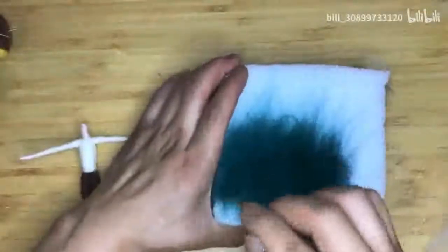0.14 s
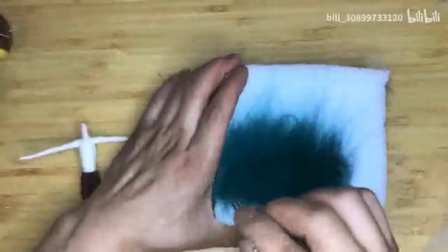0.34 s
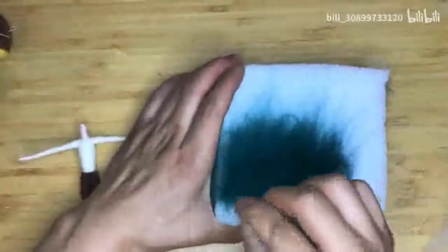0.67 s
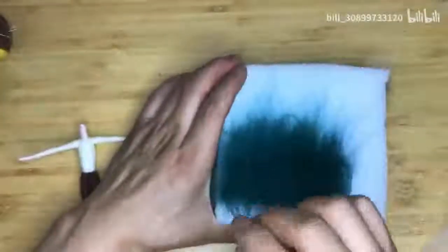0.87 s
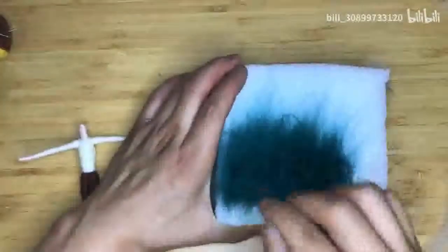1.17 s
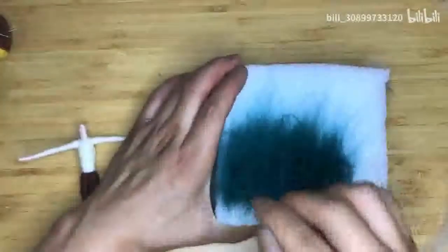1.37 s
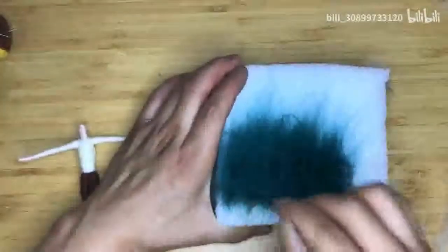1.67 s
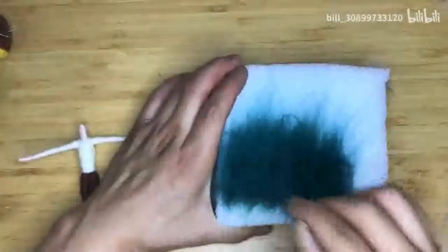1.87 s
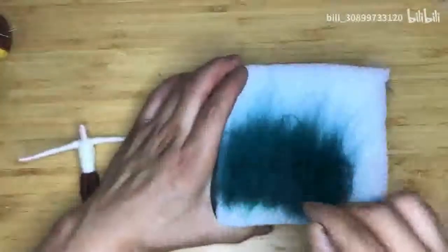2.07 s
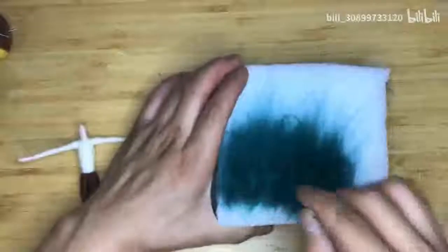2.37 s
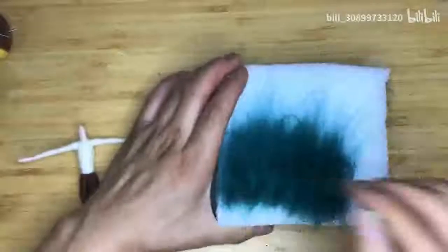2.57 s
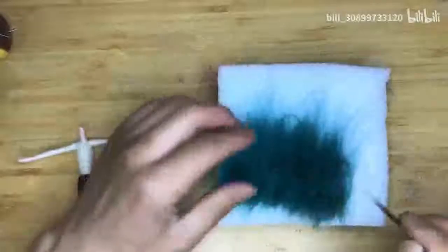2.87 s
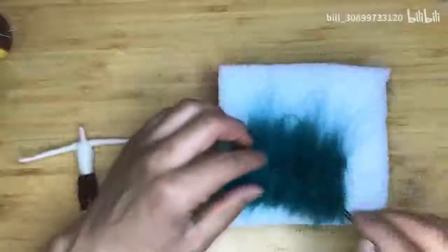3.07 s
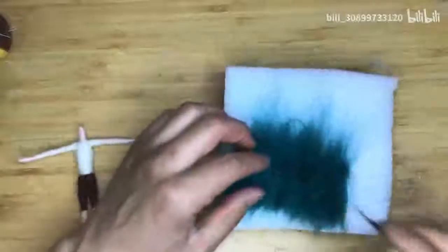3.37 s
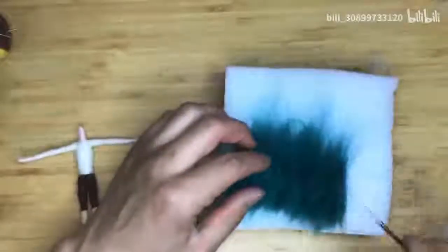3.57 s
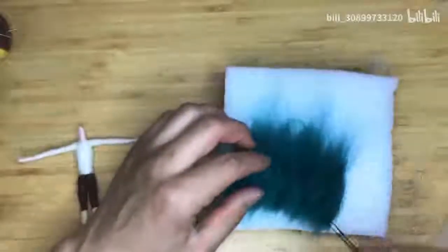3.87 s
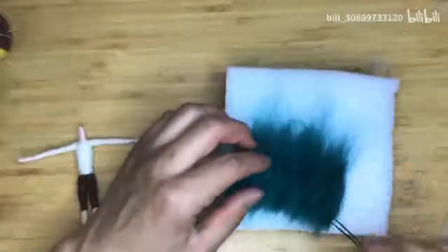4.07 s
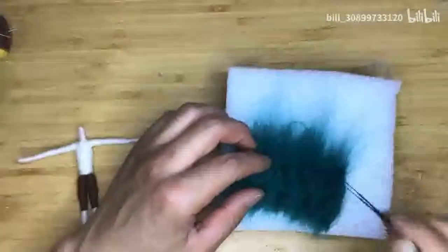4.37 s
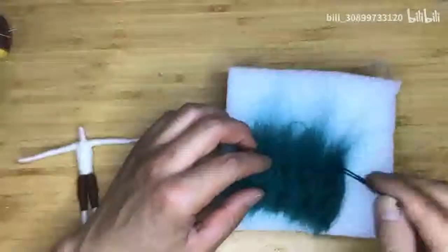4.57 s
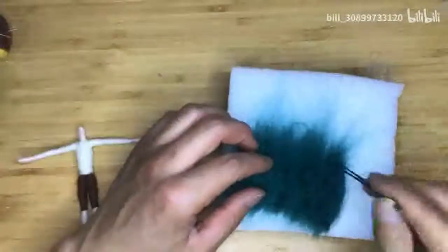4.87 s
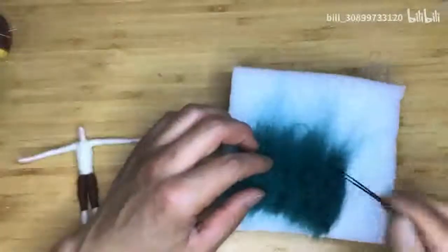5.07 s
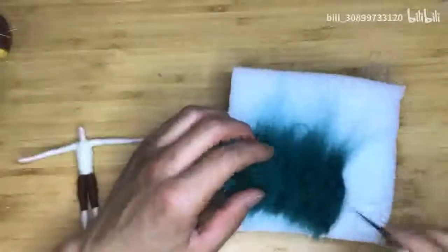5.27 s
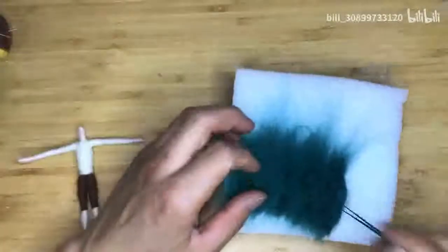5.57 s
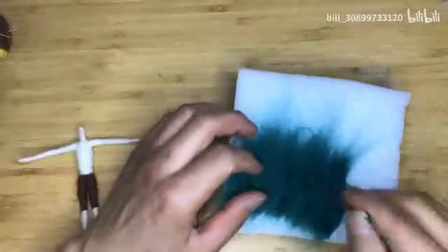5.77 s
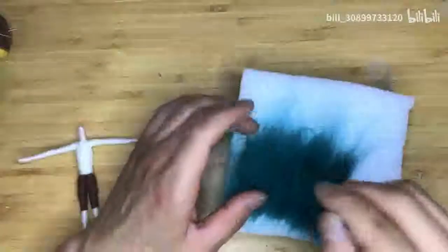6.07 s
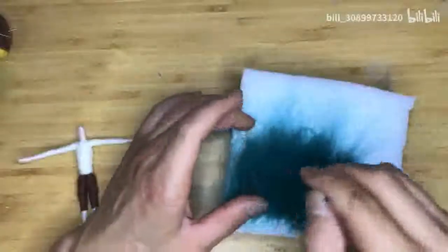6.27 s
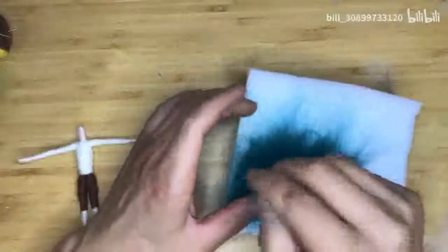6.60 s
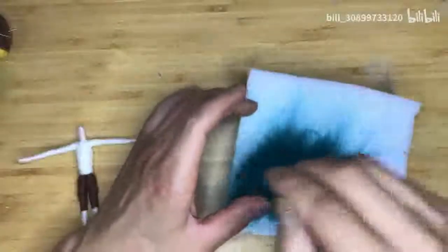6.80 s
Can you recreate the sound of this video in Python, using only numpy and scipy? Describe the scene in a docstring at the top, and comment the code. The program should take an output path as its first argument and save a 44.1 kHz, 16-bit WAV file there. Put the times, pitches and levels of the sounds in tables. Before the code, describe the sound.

Soft wool rustling gives way to brisk dry stabs, about seven a second, each a crackly push and a duller pull. After a short break with rustling, the stabbing resumes, joined by woody hand bumps and low scuffs on the table. It thins out to two isolated stabs. Very faint falling bird notes come from outside; the microphone is close, the room small and hushed.

```python
"""Wool rustles on a foam pad on a wooden table, then a needle stabs it in runs of about seven a second.
Each push excites a noisy crowd of fibre slips and a short hollow resonance; each pull rasps more softly.
From the first stab on, single strands snap, and table modes answer pushes and the hand's knocks; midway the
hand begins to slide on the wood. A faint bird calls early, midway and late; wool rustles in the pauses,
and two slow stabs come last. A short reverberant tail, noise and a low drone form the small, quiet room."""
import sys
import numpy as np
from scipy import signal
from scipy.fft import rfft, irfft
from scipy.io import wavfile

SR = 44100
rng = np.random.default_rng(int(sys.argv[2]) if len(sys.argv) > 2 else 0)


def generate_wav(sig):
    """Save sig (samples, or channels by samples) to the path in sys.argv[1] as 16-bit PCM at SR."""
    pcm = np.round(np.clip(np.atleast_2d(sig).T, -1, 1) * 32767).astype(np.int16)
    wavfile.write(sys.argv[1], SR, pcm)


N = 306054  # samples

LEAD_S = 0.015  # the point touches the fluff this long before it breaks in

# level of the pull after a usual stab, and the share of a harder or softer push that carries over
USUAL_STAB_DB, PULL_DB, PULL_FOLLOWS = -36, -43.5, 0.5

# thrusts of the needle: start_s, push_length_s, crackle_level_db
NEEDLE_STABS = [(0.339, 0.033, -38.5), (0.629, 0.036, -41), (0.801, 0.023, -35.5), (0.949, .024, -36),
                (1.093, .024, -36), (1.23, .025, -36), (1.363, 0.03, -37), (1.506, 0.022, -36.5),
                (1.642, 0.025, -38), (1.768, 0.027, -36), (1.901, 0.029, -36.5), (2.052, 0.026, -33.5),
                (2.195, .022, -32.5), (2.752, 0.052, -46.5), (2.927, 0.028, -37), (3.096, 0.023, -36),
                (3.46, .043, -40.5), (3.624, 0.028, -38), (3.767, 0.029, -33), (3.942, 0.027, -40),
                (4.093, .024, -37.5), (4.244, 0.029, -36.5), (4.403, 0.029, -32), (4.553, .026, -31.5),
                (4.7, 0.025, -33.5), (4.844, 0.028, -37.5), (4.976, 0.031, -39.5), (5.119, 0.03, -37),
                (5.26, .031, -36.5), (5.463, 0.028, -36), (5.611, 0.034, -31.5), (6.012, 0.042, -33.5),
                (6.771, 0.04, -43.5)]


def needle():
    """Periodic excitation: each pull takes its timing and strength from its push."""
    out = np.zeros(N)
    for start_s, push_s, push_db in NEEDLE_STABS:
        ring_hz = ring_centre(start_s)
        pull_db = PULL_DB + PULL_FOLLOWS * (push_db - USUAL_STAB_DB)
        add(out, start_s - LEAD_S, push(push_s, push_db, ring_hz))
        add(out, start_s, pull(pull_lag(push_s), pull_db, ring_hz, push_s))
    return out


# spectral outline of the tearing fibres: frequency_hz, gain_db
CRACKLE_COLOUR = [(200, -30), (500, -9), (1000, -3), (2200, -5.5), (2700, -1.5), (3300, -0.5), (4300, 0.5),
                  (5600, 0), (8000, -4), (9800, -7.5), (12000, -5), (13200, -7), (15000, -5)]

# the ring is as loud as the crackle at this centre; the lower it sits, the fuller it sounds
EVEN_RING_HZ, RING_DB_PER_OCTAVE = 1643, -8.5


def push(length_s, crackle_db, ring_hz, tilt_db=0.67, ring_width_hz=520,
         rub_db=-5, load_db=-17, load_hz=360):
    """Stick-slip friction crackles and rings the pad; the foam hands the growing load to the table."""
    t = clock(0.3) - LEAD_S
    speed = tearing(t, length_s)
    depth = np.clip(t / length_s, 0, 1)

    # single fibres slip off the barbs while the shaft rubs smoothly past the rest
    slips = speed * fibres(len(t), per_s=1900, spread_db=3.5)
    rub = speed * rng.standard_normal(len(t))
    friction = level(slips, 0, length_s) + level(rub, rub_db, length_s)

    crackle = hands(colour(friction, tilted(CRACKLE_COLOUR, tilt_db)))
    ring = hands(hollow(slips, ring_hz, ring_width_hz))
    thud = table_top(soften(rub * depth, load_hz, order=2))

    ring_db = crackle_db + RING_DB_PER_OCTAVE * np.log2(ring_hz / EVEN_RING_HZ)
    thud_db = (crackle_db + ring_db) / 2 + load_db
    mix = level(crackle, crackle_db, length_s) + level(ring, ring_db, length_s)
    return mix + level(thud, thud_db, length_s)


def tearing(t, length_s, entry=0.66, fluff=0.25, fluff_s=0.0026, stop_s=0.0062):
    """Friction follows the motion: the point brushes fluff, breaks in, works hardest midway and stops."""
    stroke = entry + np.sin(np.pi * np.clip(t / length_s, 0, 1))
    inside = stroke * np.exp(-np.maximum(t - length_s, 0) / stop_s)
    touch = fluff * np.exp(-np.abs(t) / fluff_s)
    return np.where(t < 0, touch, inside) * surges(len(t), per_s=458.4, depth_db=1.0)


def pull(middle_s, db, ring_hz, push_s, rasp_db=-6, rasp_hz=7500, ring_db=1,
         ring_width_hz=520, load_db=-16):
    """Friction with the grain gives a finer, duller rasp; the pad rings only while barbs catch midway."""
    t = clock(0.3)
    width_s = 0.29 * push_s  # a slow push is followed by a slow pull
    catch = np.exp(-((t - middle_s) / width_s) ** 2 / 2)
    slips = fibres(len(t), per_s=6500, spread_db=5.5)

    # the cube root lets the rasp last longer than the catch
    rasp = hands(soften(colour(np.cbrt(catch) * slips, CRACKLE_COLOUR), rasp_hz))
    ring = hands(hollow(catch * slips, ring_hz, ring_width_hz))
    thud = table_top(soften(catch * slips, 315, order=2))

    layers = [(rasp, rasp_db), (ring, ring_db), (thud, load_db)]
    return sum(level(x, db + share_db, 2 * width_s) for x, share_db in layers)


# the middle of the pull follows the start of the push by the hand's turn plus so many push lengths
TURN_S, PULL_LAG_PUSHES = 0.022, 1.416


def pull_lag(push_s):
    """Stroke kinematics: time from the start of a push to the middle of its pull."""
    return TURN_S + PULL_LAG_PUSHES * push_s


# strands that stand out give way singly: start_s, crackle_level_db, hollow_ring_level_db
STRAND_SNAPS = [(0.3401, -24.5, -14.5), (0.3498, -39, -22), (1.102, -33, -24), (1.2485, -23.5, -47),
                (1.385, -35, -25), (1.5051, -27.5, -30.5), (1.6503, -24, -27.5), (1.7651, -21.5, -29),
                (1.79, -24, -26), (1.9241, -31, -26), (2.1941, -25, -29), (3.0951, -30, -29),
                (3.635, -25, -60), (3.8587, -36, -40), (4.169, -35, -42.5), (4.2521, -24, -60),
                (4.8451, -26, -33.5), (5.489, -32, -32), (5.5345, -34.5, -53), (6.016, -21, -34),
                (6.436, -55, -68)]


def snaps(length_s=0.0018, fray=0.21, fray_s=0.0012, tilt_db=1.44, muffling=0.6, ring_width_hz=240):
    """Impulsive rupture: a click with brief fraying, duller deep in the pad where the ring outweighs it."""
    out, t = np.zeros(N), clock(0.03)
    for start_s, crackle_db, ring_db in STRAND_SNAPS:
        click = (t == 0) + fray * np.exp(-t / fray_s) * rng.standard_normal(len(t))
        snap_tilt_db = tilt_db - muffling * max(ring_db - crackle_db, 0)
        crackle = colour(click, tilted(CRACKLE_COLOUR, snap_tilt_db))
        ring = hollow(click, ring_centre(start_s), ring_width_hz)
        add(out, start_s, level(crackle, crackle_db, length_s) + level(ring, ring_db, length_s))
    return out


def fibres(count, per_s, spread_db):
    """Random point process: tiny slips at chance moments, a few much stronger than the rest."""
    chance = rng.random(count)
    size = np.minimum(rng.standard_normal(count), 2)
    sign = np.sign(rng.standard_normal(count))
    return (chance < per_s / SR) * sign * undb(spread_db * size)


def surges(count, per_s, depth_db):
    """Random amplitude modulation: the grip tightens and lets go unevenly."""
    steps = np.clip(rng.standard_normal(400), -2, 2)
    place = np.arange(count) / SR * per_s
    return undb(depth_db * np.interp(place, np.arange(len(steps)), steps))


# spectral outline of the ring of needle and pad: frequency_hz, gain_db
HOLLOW_COLOUR = [(350, -1), (650, -10.5), (880, -4), (1000, -6.5), (1130, 2), (1280, 2), (1450, -4.5),
                 (1650, 0), (1950, 1.5), (2300, 2.5), (2700, 0), (5000, -8), (12000, 2.5)]


def hollow(slips, hz, width_hz):
    """Damped resonance: needle and pad answer each slip with a ring of a few milliseconds."""
    return colour(resonate(slips, hz, width_hz), HOLLOW_COLOUR)


# the pad's ring shifts as the needle wanders over the wool: time_s, ring_centre_hz
RING_CENTRES = [(0.34, 1330), (2.1, 1546), (3.8, 1593), (4.5, 1890), (5.25, 1520), (5.6, 1790), (6.0, 1574),
                (6.8, 1510)]


def ring_centre(at_s):
    """Resonance depends on place: where the pad rings at the spot under the needle."""
    return np.interp(at_s, *np.transpose(RING_CENTRES))


def hands(x, reach_s=0.002, count=4):
    """Comb filtering: faint reflections off the moving hands colour every stroke differently."""
    out = x.copy()
    for place in rng.random(count):
        lag = 1 + int(place * reach_s * SR)
        out[lag:] += 0.2 * rng.choice([-1, 1]) * x[:-lag]
    return out


# low modes of the table top: frequency_hz, level_db, t60_s
TABLE_MODES = [(75, -24, .2), (122, -9, .15), (145, -1, .24), (212, -2, .17), (248, 0, .13), (335, -8, .06),
               (462, 0, .08), (510, -7, .05), (735, -6, .04), (955, 5, .05), (1250, 2, .035)]


def table_top(force, scatter_db=2.0):
    """Modal superposition: the modes ring together, weighted a little differently at every spot."""
    t = clock(0.35)
    spot_db = scatter_db * rng.standard_normal(len(TABLE_MODES))
    ring = np.zeros(len(t))
    for k, (hz, db, t60) in enumerate(TABLE_MODES):
        decay = undb(db + spot_db[k] - 60 * t / t60)
        ring += (-1) ** k * decay * np.sin(2 * np.pi * hz * t)
    return signal.fftconvolve(force, ring)[:len(force)]


# spectral outline of the table's crowd of short, high modes: frequency_hz, gain_db
CLACK_COLOUR = [(200, -15), (450, -4), (620, -14), (950, 4.5), (1400, -3.5), (2200, 1), (3200, -9),
                (6000, -15.5), (12000, -8)]

# the hand meets the table: start_s, modes_level_db, clack_level_db, contact_hardness_as_upper_edge_hz
HAND_KNOCKS = [(0.343, -38, -56, 300), (2.777, -39, -38.5, 1700), (3.069, -42.5, -38.5, 1700),
               (3.892, -44.5, -49, 1170), (3.926, -42, -44, 1470), (4.302, -44, -37.5, 2400),
               (4.439, -31, -28.5, 2020), (4.881, -32.5, -25, 2580)]


def knocks(length_s=0.014, scuff=0.096, scuff_s=0.015, clack_s=0.0083, body_hz=900):
    """Impact excitation: a scuffing blow rings low modes under a woody clack; softer contact is duller."""
    out, t = np.zeros(N), clock(0.35)
    for start_s, body_db, clack_db, edge_hz in HAND_KNOCKS:
        force = (t == 0) + scuff * np.exp(-t / scuff_s) * rng.standard_normal(len(t))
        body = table_top(soften(soften(force, edge_hz, order=2), body_hz))
        burst = np.exp(-t / clack_s) * rng.standard_normal(len(t))
        clack = soften(colour(burst, CLACK_COLOUR), edge_hz, order=2)
        add(out, start_s, level(body, body_db, length_s) + level(clack, clack_db, length_s))
    return out


# the hand slides on the wood: start_s, level_db
HAND_SLIDES = [(2.983, -53.5), (3.15, -50), (3.939, -48.5), (4.456, -52), (4.621, -52), (4.751, -48),
               (4.909, -48), (5.031, -57.5)]


def slides(length_s=0.071, start_hz=1400, end_hz=500, width_hz=400, wood_db=-7):
    """Ragged friction stirs the table's low modes; the band of the rub sinks as the hand slows."""
    out, t = np.zeros(N), clock(0.2)
    progress = np.minimum(t / length_s, 1)
    centre_hz = start_hz * (end_hz / start_hz) ** progress
    phase = 2 * np.pi * np.cumsum(centre_hz) / SR
    for start_s, db in HAND_SLIDES:
        grains = fibres(len(t), per_s=900, spread_db=3.5) * np.sin(np.pi * progress)
        rub = soften(grains, width_hz, order=2) * np.sin(phase)
        wood = table_top(soften(grains, 1230, order=2))
        mix = level(rub, 0, length_s) + level(wood, wood_db, length_s)
        add(out, start_s, level(mix, db, length_s))
    return out


# spectral outline of shifting wool: frequency_hz, gain_db
RUSTLE_COLOUR = [(200, -12), (500, -25.5), (1000, -5.5), (1500, 3), (2500, -2), (5000, -2.5), (9000, -2),
                 (15500, -8.5)]

# wool is brushed and shifted: start_s, length_s, level_db, tilt_db_per_octave
WOOL_RUSTLES = [(0.01, 0.18, -68.5, -2), (0.208, 0.16, -65.5, -22), (0.3, 0.084, -56, -4),
                (2.301, 0.14, -57, -2.5), (2.404, 0.052, -50, 1), (2.576, 0.086, -64, -2),
                (2.712, 0.054, -66.5, -2.5), (5.31, 0.13, -58, -1), (5.789, 0.1, -61.5, 0.5),
                (5.872, 0.077, -62.5, -1.5), (6.167, 0.29, -68.5, -5)]


def rustles():
    """Granular friction: loose fibres slip over each other in soft, uneven swells."""
    out, t = np.zeros(N), clock(0.4)
    for start_s, length_s, db, tilt_db in WOOL_RUSTLES:
        arc = np.sin(np.pi * np.minimum(t / length_s, 1))
        swell = arc * surges(len(t), per_s=120, depth_db=2.0)
        slips = swell * fibres(len(t), per_s=2600, spread_db=-0.5)
        rustle = hands(colour(slips, tilted(RUSTLE_COLOUR, tilt_db)))
        add(out, start_s, level(rustle, db, length_s))
    return out


def room(x, t60_s=0.27, treble_t60_s=0.22, split_hz=2500, wet_db=-14, treble_db=-3, first_s=0.0057):
    """Reverberation: nearby walls return a short, faint tail of exponentially decaying noise."""
    t = clock(0.4)
    noise = rng.standard_normal(len(t)) * (t > first_s)
    low = soften(noise, split_hz)
    low_decay = undb(-60 * t / t60_s)
    treble_decay = undb(treble_db - 60 * t / treble_t60_s)
    tail = low * low_decay + (noise - low) * treble_decay
    spread = np.sqrt(np.sum(low_decay ** 2))
    return x + undb(wet_db) * signal.fftconvolve(x, tail / spread)[:N]


# notes of a faint bird outside: start_s, level_db
BIRD_NOTES = [(.735, -76), (.895, -78), (4.19, -77), (4.345, -73), (6.255, -75), (6.39, -71), (6.695, -71)]


def bird(start_hz=8300, end_hz=4800, length_s=0.07):
    """Frequency glide: thin falling notes, blurred by distance into narrow bands of noise."""
    out, t = np.zeros(N), clock(0.15)
    progress = np.minimum(t / length_s, 1)
    pitch_hz = start_hz + (end_hz - start_hz) * progress
    phase = 2 * np.pi * np.cumsum(pitch_hz) / SR
    for start_s, db in BIRD_NOTES:
        blur = soften(rng.standard_normal(len(t)), 220, order=2)
        note = blur * np.sin(phase) * np.sin(np.pi * progress)
        add(out, start_s, level(note, db, length_s))
    return out


# spectral outline of the room noise: frequency_hz, gain_db
AIR_COLOUR = [(15, -50.5), (25, -9), (152, -8), (173, -18), (204, -9.5), (305, -17), (340, -12), (445, -18),
              (684, -20.5), (895, -21.5), (1300, -23.5), (6050, -32.5), (7500, -31.5), (9550, -37),
              (15500, -35.5)]


def air(hiss_db=-64, drone_hz=61, drone_width_hz=12, drone_db=-69.0):
    """Stationary filtered noise: faint room noise over a low drone."""
    hiss = colour(rng.standard_normal(N), AIR_COLOUR, size=8192)
    drone = rng.standard_normal(N)
    for _ in range(2):
        drone = resonate(drone, drone_hz, drone_width_hz)
    return level(hiss, hiss_db, N / SR) + level(drone, drone_db, N / SR)


def undb(db):
    """Logarithmic level: decibels to amplitude gain."""
    return 10 ** (np.asarray(db) / 20)


def clock(length_s):
    """Uniform sampling: sample times in seconds over a stretch."""
    return np.arange(int(length_s * SR)) / SR


def level(x, db, length_s):
    """Energy normalisation: the energy of x, spread over length_s, has this rms level."""
    return x * undb(db) * np.sqrt(length_s * SR / (np.sum(x ** 2) + 1e-18))


def add(track, at_s, x):
    """Linear superposition: mix x into the track."""
    start = max(int(at_s * SR), 0)
    track[start:start + len(x)] += x[:max(N - start, 0)]


def colour(x, points, size=2048):
    """Minimum-phase filtering: a causal filter with the given (Hz, dB) outline."""
    hz, db = np.transpose(points)
    bins_hz = np.fft.rfftfreq(size, 1 / SR)
    log_gain = np.log(undb(np.interp(np.log(bins_hz + 1), np.log(hz), db)))
    # folding the cepstrum onto positive times makes the filter causal
    cepstrum = irfft(log_gain)[:size // 2]
    cepstrum[1:] *= 2
    response = irfft(np.exp(rfft(cepstrum, size)))
    return signal.fftconvolve(x, response)[:len(x)]


def tilted(points, db_per_octave):
    """Spectral tilt: an outline made brighter or duller above 1500 Hz."""
    return [(hz, db + db_per_octave * np.log2(max(hz, 1500) / 1500)) for hz, db in points]


def resonate(x, hz, width_hz):
    """Second-order resonance: one peak whose Q is centre over bandwidth."""
    return signal.lfilter(*signal.iirpeak(hz, hz / width_hz, fs=SR), x)


def soften(x, edge_hz, order=1):
    """Low-pass filtering: treble above the edge is attenuated."""
    return signal.sosfilt(signal.butter(order, min(edge_hz, 0.45 * SR), fs=SR, output="sos"), x)


def scene():
    """Superposition: everything on the table sounds into the same small room, over bird and air."""
    on_table = needle() + snaps() + knocks() + slides() + rustles()
    return (room(on_table) + bird() + air())[None]


def record(dry, bass_hz=48, top_hz=15550):
    """Band limitation: a high-pass drops the deep bass and a steep low-pass cuts the top."""
    high_pass = signal.butter(3, bass_hz, "high", fs=SR, output="sos")
    low_pass = signal.ellip(12, 0.2, 70, top_hz, fs=SR, output="sos")
    return signal.sosfilt(low_pass, signal.sosfilt(high_pass, dry))


dry = scene()
out = record(dry)
generate_wav(out)
```